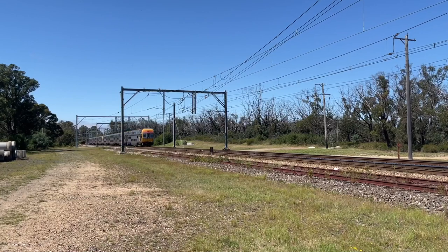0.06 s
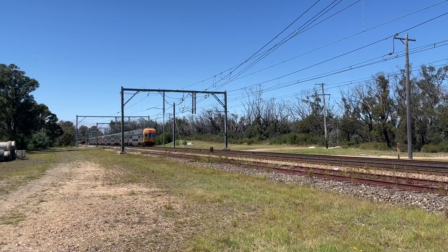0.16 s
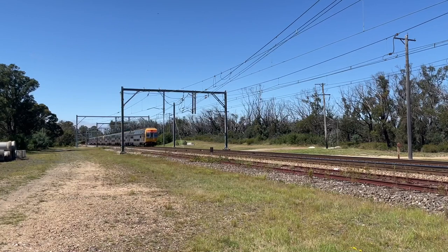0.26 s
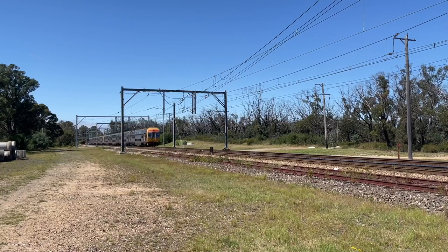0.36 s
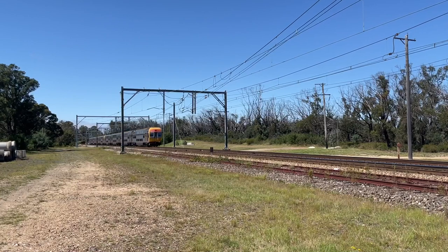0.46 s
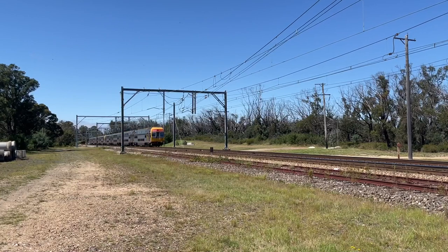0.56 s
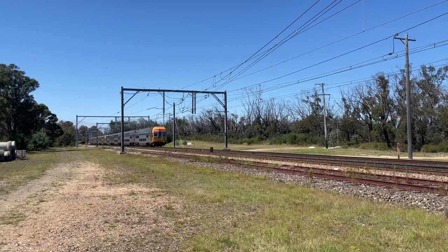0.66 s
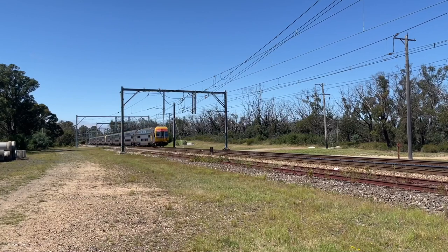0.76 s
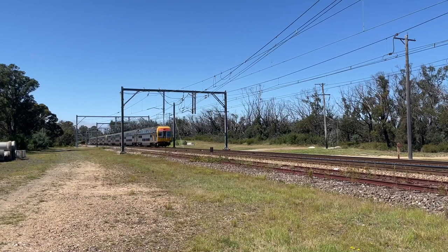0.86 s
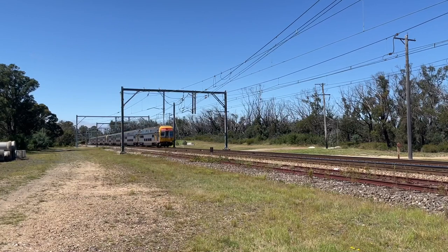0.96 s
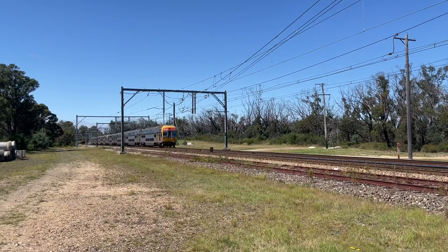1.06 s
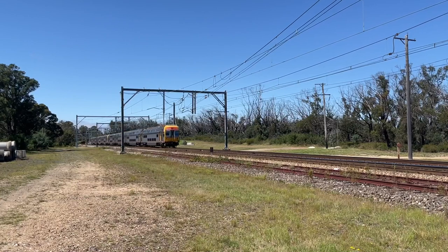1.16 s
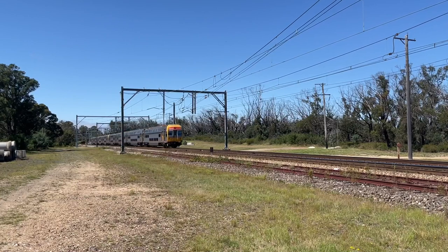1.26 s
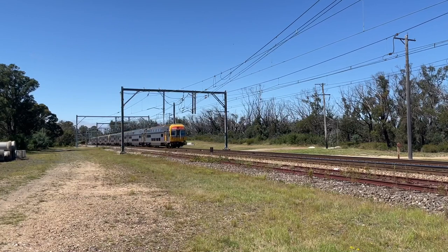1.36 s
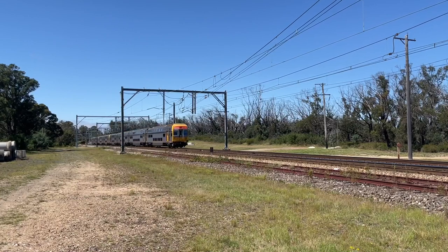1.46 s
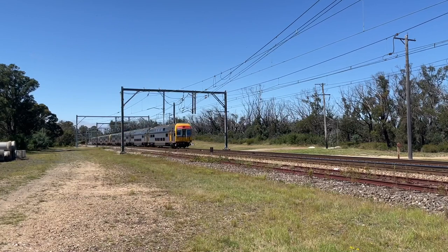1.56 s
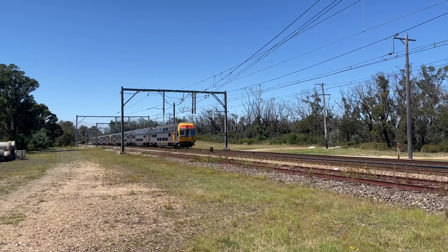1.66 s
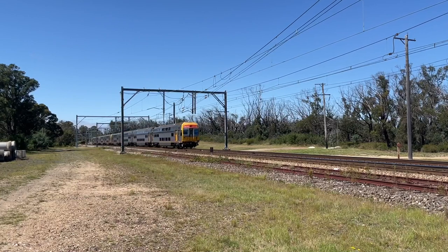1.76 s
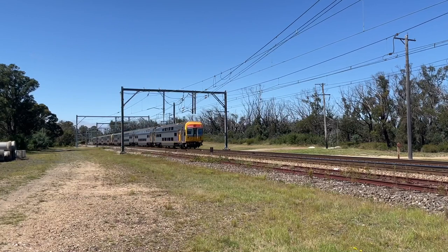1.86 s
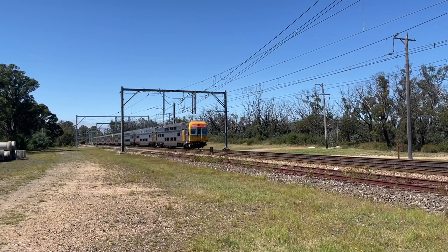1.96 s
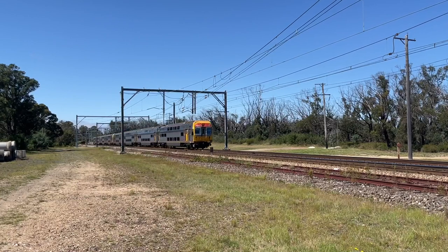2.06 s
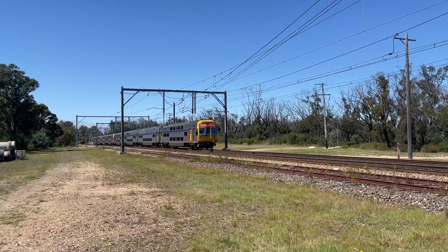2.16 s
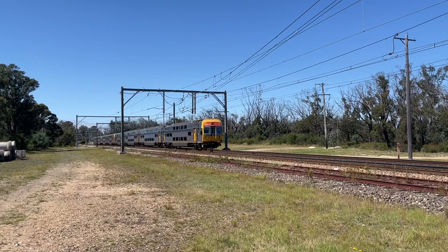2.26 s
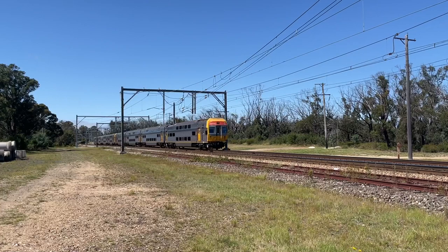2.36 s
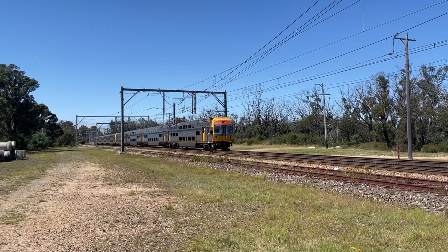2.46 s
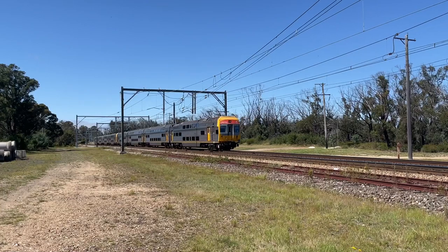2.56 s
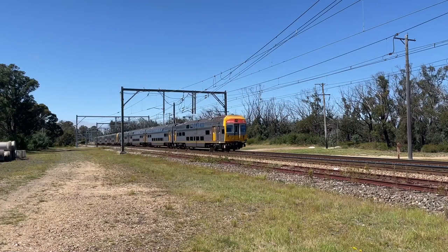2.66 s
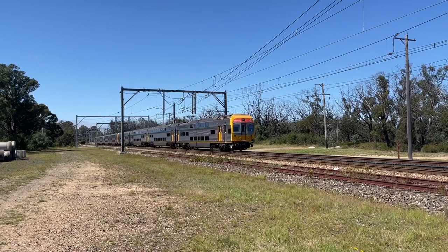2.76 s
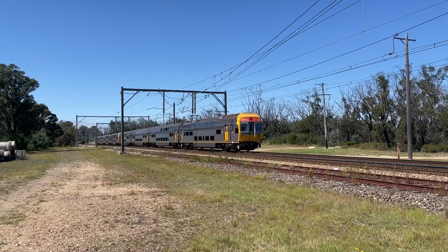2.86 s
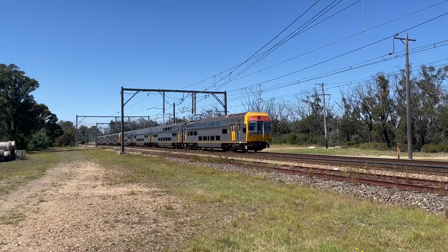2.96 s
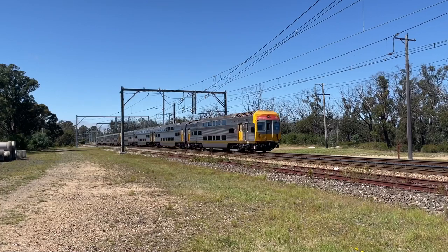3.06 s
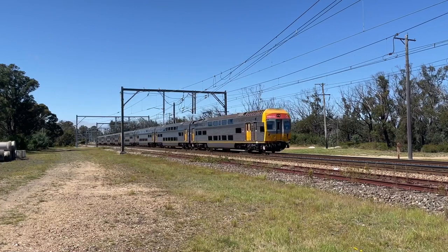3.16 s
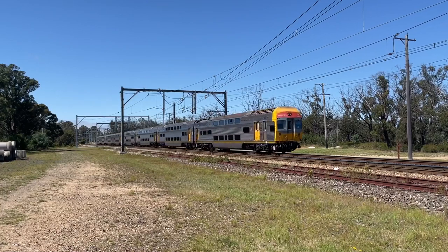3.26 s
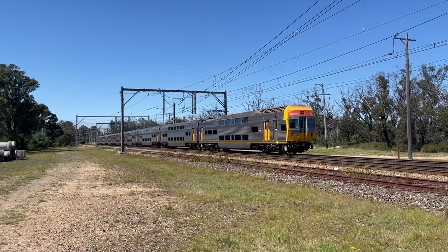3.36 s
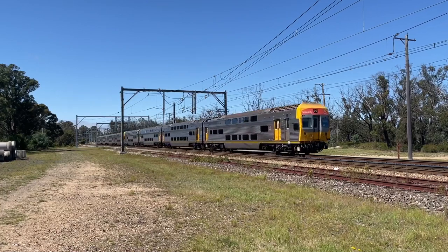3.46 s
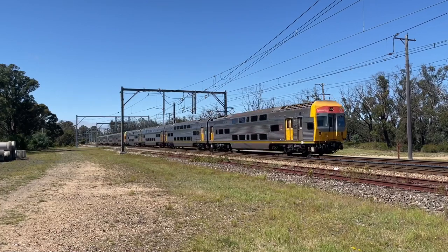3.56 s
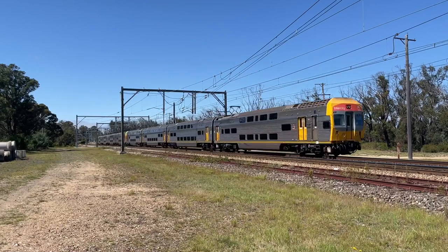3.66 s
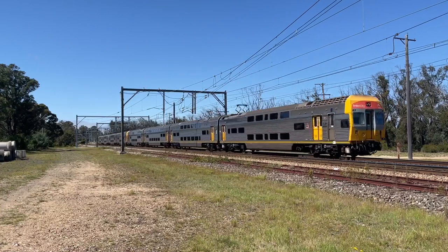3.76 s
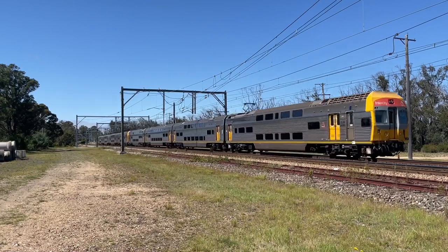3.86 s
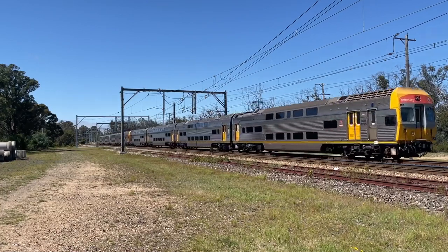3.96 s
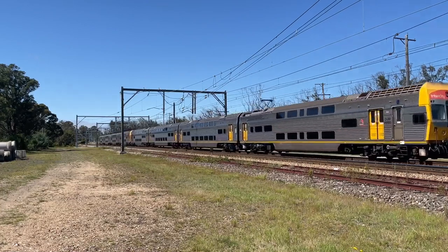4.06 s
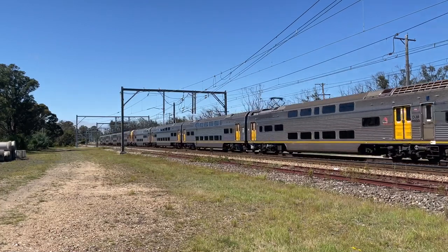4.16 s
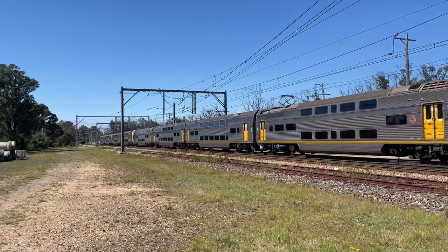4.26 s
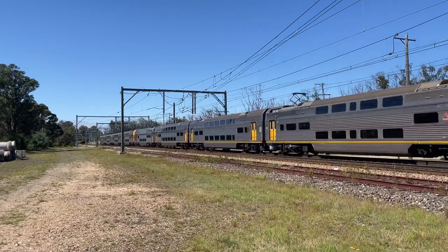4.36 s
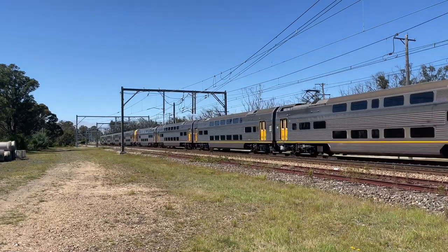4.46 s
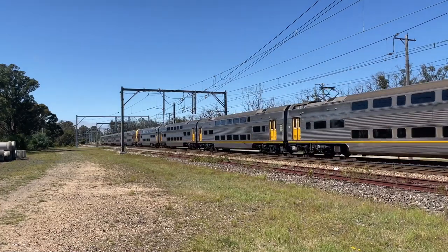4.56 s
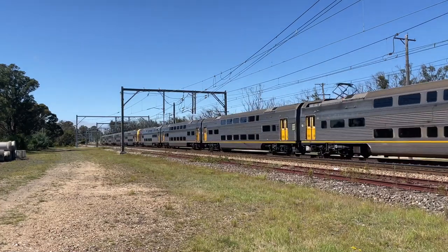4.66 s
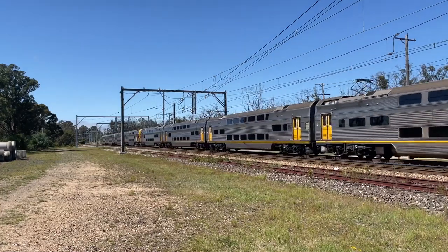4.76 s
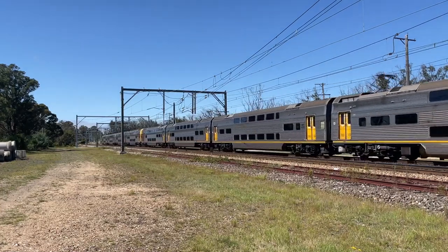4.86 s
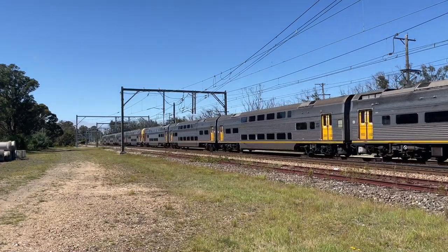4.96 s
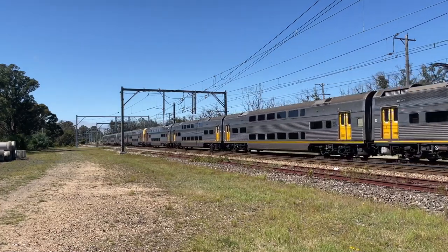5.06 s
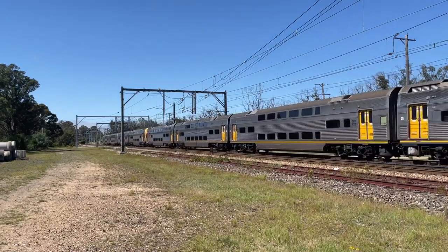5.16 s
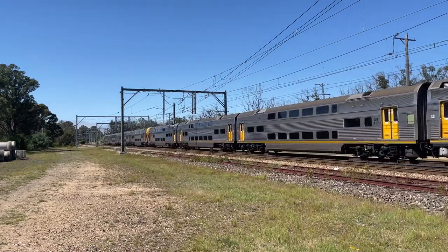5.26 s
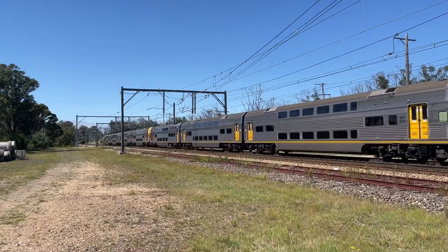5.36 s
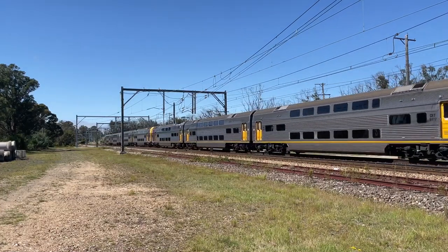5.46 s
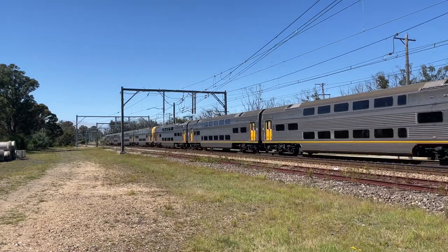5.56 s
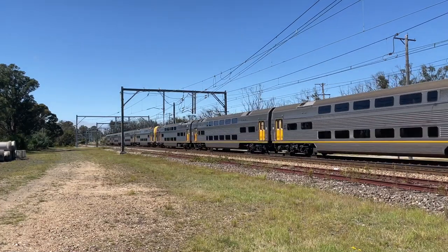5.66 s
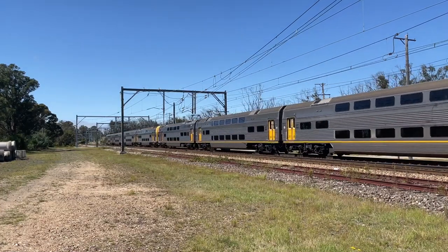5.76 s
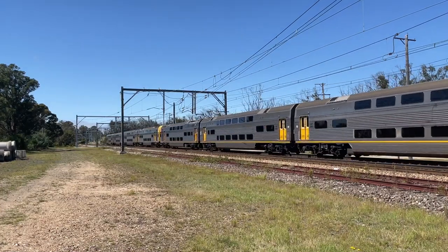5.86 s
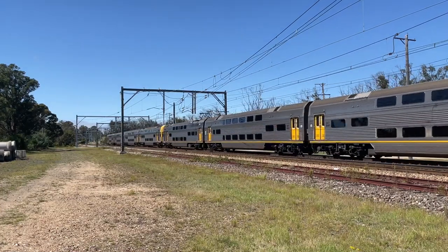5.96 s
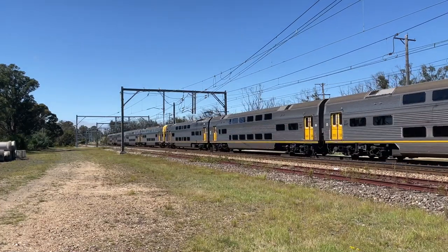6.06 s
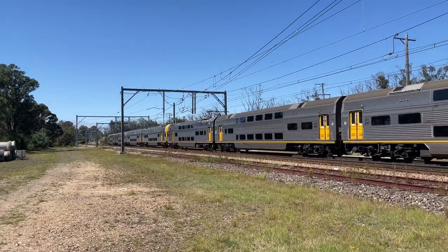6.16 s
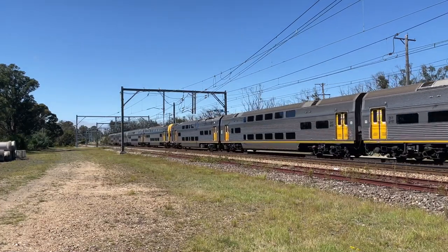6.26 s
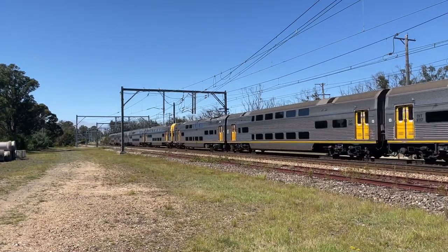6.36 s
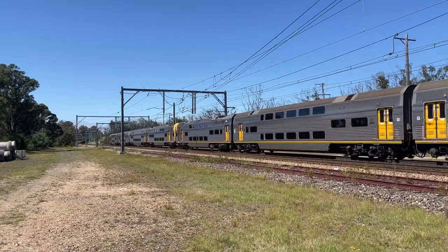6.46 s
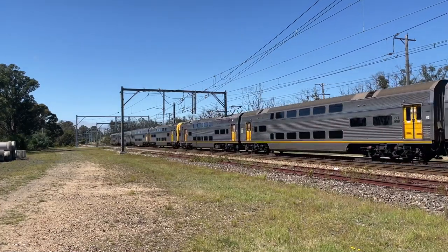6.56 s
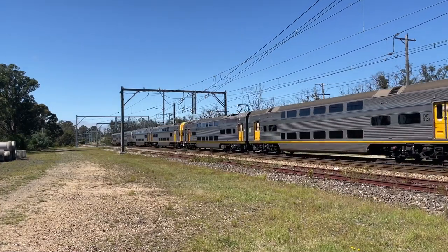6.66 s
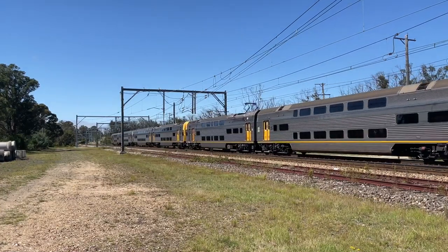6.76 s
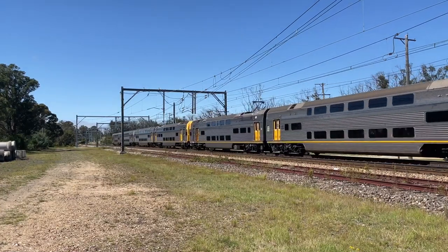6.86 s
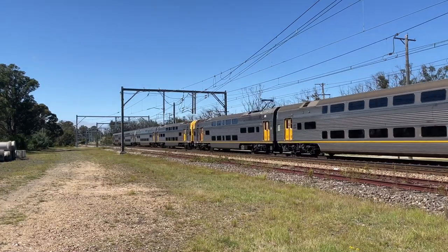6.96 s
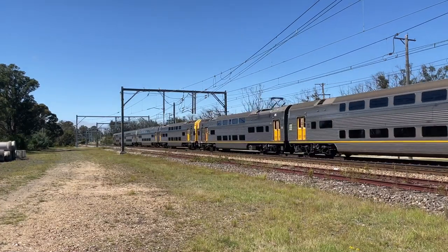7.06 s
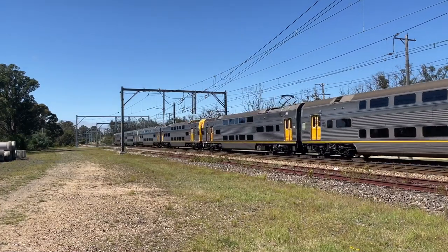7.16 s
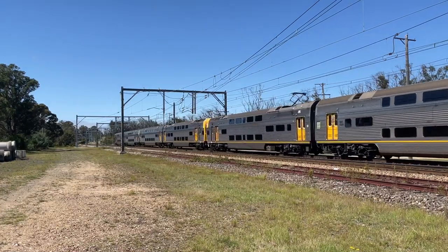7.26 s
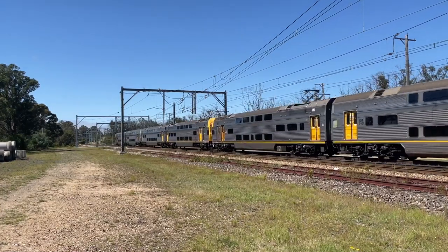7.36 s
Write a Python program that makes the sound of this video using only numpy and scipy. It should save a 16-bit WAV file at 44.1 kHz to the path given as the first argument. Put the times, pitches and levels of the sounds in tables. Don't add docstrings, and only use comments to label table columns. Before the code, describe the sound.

Wind buffets a phone beside a railway as a bird calls, then a train rolls past with ringing wheels, knocks and gear whine.

```python
import sys
import numpy as np
from scipy import signal
from scipy.fft import rfft, irfft, next_fast_len
from scipy.io import wavfile
from scipy.ndimage import uniform_filter1d

SR = 44100
rng = np.random.default_rng(int(sys.argv[2]) if len(sys.argv) > 2 else 0)


def transcribe(u):
    v = np.clip(np.atleast_2d(u).T, -1, 1)
    q = np.round(v * 32767).astype(np.int16)
    wavfile.write(sys.argv[1], SR, q)


def to_linear_factor(level_db):
    exponent = np.asarray(level_db, float) / 20
    return 10 ** exponent


N = 325899
T = np.arange(N) / SR
FAST = next_fast_len(N, True)
HZ = np.fft.rfftfreq(FAST, 1 / SR) + 1

# t/s, level against mid pass/dB, hiss of shoes and wire/dB
NEAR = [(0, -28.5, -39), (1.5, -21.5, -29), (2.4, -17.5, -19.5), (3.0, -11, -8), (3.3, -10, -7.5),
        (3.55, -6.5, -8.5), (4.0, -4, -3), (4.6, 0, 2.5), (4.85, -0.1, 0.4), (5.1, 0.9, -0.5),
        (5.7, 1.5, -3), (5.95, 1.5, -0.5), (6.3, 2, -5), (6.8, 0.7, -1.5), (7.39, 2.5, -2)]
# t/s, f/Hz, level/dB
MESH = [(0, 406, -68), (1.3, 404.3, -55.5), (2.5, 397.5, -50.5), (3.2, 391.2, -47), (3.8, 387.9, -43),
        (4.1, 386.5, -36), (4.6, 384.8, -35.5), (4.95, 380.2, -37), (5.3, 384.7, -34.5), (5.55, 380.2, -38),
        (5.8, 373.7, -30), (6.05, 380.6, -39), (6.2, 378.2, -35), (6.4, 379.4, -32), (6.75, 372, -31.5),
        (6.9, 370, -35.5), (7.0, 372, -34), (7.39, 365.7, -38.5)]


def curves(table):
    s, *columns = np.transpose(table)
    return [np.interp(T, s, c) for c in columns]


def over_hz(table):
    hz, *columns = np.transpose(table)
    return [np.interp(np.log(HZ), np.log(hz), c) for c in columns]


def walk(rate):
    hold = int(SR / rate)
    steps = np.repeat(rng.standard_normal(N // hold + 1), hold)
    return 1.301 * uniform_filter1d(uniform_filter1d(steps, hold), hold)[:N]


def bands(spectrum, lo_hz, count, per_octave):
    white = rfft(rng.standard_normal((2, FAST)))
    noise = white * to_linear_factor(over_hz(spectrum)[0]) * np.sqrt(SR / 2)
    place = np.log2(HZ / lo_hz) * per_octave
    for k in range(count):
        window = np.cos(np.pi / 2 * np.clip(place - k, -1, 1))
        yield lo_hz * 2 ** (k / per_octave), irfft(noise * window, FAST)[:, :N]


def ring(hz, width):
    pole = np.exp(-np.pi * width * 1.55 / SR)
    gain = np.sqrt((1 - pole ** 2) ** 3 / (1 + pole ** 2) / 2)
    settle = 3000
    shaking = rng.standard_normal((2, 2, len(hz) + settle))
    slow = signal.lfilter([gain * np.sqrt(2)], [1, -2 * pole, pole ** 2], shaking)[..., settle:]
    phase = 2 * np.pi * np.cumsum(hz) / SR
    return slow[0] * np.cos(phase) + slow[1] * np.sin(phase)


def add(out, s, piece):
    i = int(s * SR)
    lo, hi = max(i, 0), min(i + piece.shape[-1], N)
    if hi > lo:
        out[:, lo:hi] += piece[..., lo - i:hi - i]


def burst(hz, width, rise_s, fall_s):
    t = np.arange(int((rise_s + 5 * fall_s) * SR)) / SR
    shape = np.clip(t / rise_s, 0, 1) * np.exp(-np.clip(t - rise_s, 0, None) / fall_s)
    hit = ring(np.full(len(t), 1. * hz), width) * shape
    return hit / np.abs(hit).max(axis=1, keepdims=True)


def thump(hz, rise_s, fall_s):
    t = np.arange(int((rise_s + 5 * fall_s) * SR)) / SR
    rise = np.sin(np.pi / 2 * np.clip(t / rise_s, 0, 1)) ** 2
    shape = rise * np.exp(-np.clip(t - rise_s, 0, None) / fall_s)
    return np.sin(2 * np.pi * (hz * t * (1 - 1.35 * t) + rng.random((2, 1)))) * shape


def wind():
    # t/s, gust level/dB
    gust_level = [(0, -39), (.5, -47.5), (.65, -42.5), (1.94, -36), (1.99, -31), (2.55, -29.5),
                  (2.9, -37.5), (3.2, -34), (3.4, -42), (3.82, -45), (3.92, -37.5), (4.5, -35.5),
                  (5.45, -33.5), (5.65, -29.5), (6.3, -35), (6.88, -31), (7.0, -30), (7.39, -28.5)]
    # f/Hz, level/dB per Hz
    gust_colour = [(20, -38), (42, -2), (62, 3.5), (100, 2.5), (160, -1), (250, -18.5), (420, -19.5),
                   (700, -87)]
    # t/s, peak level/dB, f/Hz
    buffets = [(0.619, -27, 62), (0.878, -41, 70), (1.209, -24, 63.6), (1.477, -27, 80), (1.769, -23, 61.8),
               (1.969, -15, 116), (2.03, -17.5, 64), (2.116, -23, 56), (2.238, -23, 115), (2.398, -17, 72),
               (2.607, -18, 113), (2.779, -17.5, 97), (2.828, -18, 102), (2.969, -15, 147),
               (3.038, -22.5, 231), (3.118, -17.5, 77), (3.191, -20.5, 57), (3.477, -20, 94.5),
               (3.873, -21, 125), (4.347, -31, 209.1), (4.519, -25, 147), (4.872, -19.5, 149.8),
               (5.138, -20, 199.4), (5.6, -15.5, 86.36), (5.719, -18, 53.96), (6.036, -18.5, 100),
               (6.16, -20, 197.4), (6.931, -14, 81.9), (7.059, -16, 79.5), (7.127, -15.5, 65.95)]
    thud_db = curves(gust_level)[0]
    flutter_db = -39 + 1.11 * (thud_db + 35.5)
    out, eddy = np.zeros((2, N)), walk(18)
    for hz, band in bands(gust_colour, 25.25, count=10, per_octave=1.95):
        share = np.clip(np.log2(hz / 90) / 0.56, 0, 1)
        gust_db = (1 - share) * thud_db + share * flutter_db
        out += band * to_linear_factor(gust_db - 19.5 + 0.57 * eddy + 0.87 * walk(13))
    for s, db, hz in buffets:
        add(out, s, to_linear_factor(db - 3.0) * thump(hz, 0.012, 0.02))
        add(out, s, to_linear_factor(db - 8.5) * burst(180.4, 75, 0.0055, .02))
    return out


def road():
    # f/Hz, level/dB per Hz
    traffic = [(60, -63), (150, -71), (300, -77), (550, -80.5), (900, -77.5), (1500, -83.5), (2400, -89.5),
               (3400, -100), (3900, -95), (4600, -106), (6500, -109), (8800, -111), (10000, -126),
               (12500, -124), (14200, -116), (15800, -114)]
    # t/s, f/Hz, level/dB
    drone = [(0, 135.2, -35), (.35, 135.2, -36), (.7, 135.2, -38), (.9, 135.2, -44), (1.15, 135.2, -46),
             (1.4, 135.2, -38), (1.7, 135, -55), (7.39, 135, -90)]
    out, swell = np.zeros((2, N)), walk(1.0)
    for _, band in bands(traffic, 60.2, count=17, per_octave=1.752):
        out += band * to_linear_factor(0.75 * swell + 1.56 * walk(8.4))
    hum_hz, hum_db = curves(drone)
    return out + np.sin(2 * np.pi * np.cumsum(hum_hz) / SR) * to_linear_factor(hum_db - 2.5 + 0.36 * walk(9.5))


def whistle(length_s, from_hz, to_hz):
    count = int(length_s * SR)
    note = np.sin(2 * np.pi * np.cumsum(np.linspace(from_hz, to_hz, count)) / SR)
    return np.outer([1, .5], note * signal.windows.tukey(count, .5))


def birds():
    # t/s, peak level/dB
    calls = [(0.0928, -37.5), (0.774, -37.5), (1.4005, -37), (2.149, -37)]
    # t from the loudest/s, f/Hz, width/Hz, length/ms, level/dB
    clicks = [(-.142, 5500, 400, 4, -14), (-.133, 5600, 400, 5, -13), (-.121, 5400, 1500, 5, -6),
              (-.113, 5700, 1500, 4, -12), (-.1, 5240, 1500, 5, -9), (-.1, 5300, 500, 33, -12.5),
              (-.049, 5200, 2200, 3.8, -2), (-.035, 5400, 500, 4, -24), (-.027, 5400, 500, 3.6, -15),
              (0, 5060, 2150, 5, 3.5), (.01, 5000, 2000, 4, -11), (.012, 5170, 1400, 59, -12)]
    # t from the loudest/s, length/s, start f/Hz, end f/Hz, level/dB
    whistles = [
        (-.023, .026, 6350, 6300, -21),
        (.014, .045, 4950, 4550, -19),
        (.022, .032, 7400, 6850, -25),
    ]
    out = np.zeros((2, N))
    for s, call_db in calls:
        for lag, hz, width, ms, db in clicks:
            click = burst(hz, width, .0012, ms / 2000)
            octave = burst(2 * hz, 1200, .0012, ms / 2000)
            add(out, s + lag, to_linear_factor(call_db + db + 4.0) * (click + 0.089 * octave))
        for lag, length_s, from_hz, to_hz, db in whistles:
            add(out, s + lag, to_linear_factor(call_db + db) * whistle(length_s, from_hz, to_hz))
    return signal.sosfilt(signal.butter(4, 4100, "high", fs=SR, output="sos"), out)


def steady(pair, hold_s):
    return pair / np.sqrt(uniform_filter1d(pair ** 2, int(hold_s * SR), mode="reflect") + .05)


def glide(length_s, from_hz, to_hz, width, edge):
    count = int(length_s * SR)
    tone = steady(ring(np.linspace(from_hz, to_hz, count), width), .07)
    return tone * signal.windows.tukey(count, np.clip(edge, 0, 1))


def trills():
    # t/s, length/s, level/dB
    runs = [
        (0.2, 0.41, -70),
        (0.828, 0.21, -68),
        (1.43, 0.56, -74),
    ]
    out = np.zeros((2, N))
    for s, length_s, db in runs:
        for lag in np.arange(0, length_s, .036):
            swell = np.sin(np.pi * (lag + .03) / (length_s + .06)) ** 0.81
            add(out, s + lag, to_linear_factor(db + 3) * swell * glide(.032, 9350, 8300, 150, .5))
    return out


def bush(pair):
    t = np.arange(int(.15 * SR)) / SR
    tail = rng.standard_normal((2, len(t))) * to_linear_factor(-60 * t / 0.13) * (t > .003)
    tail = to_linear_factor(-7.5) * tail / np.sqrt(np.sum(tail[0] ** 2))
    return pair + signal.oaconvolve(pair, tail, axes=1)[:, :N]


def nearness(hz):
    layer_hz = [900, 3200, 12000]
    growth = [0.8, 0.94]
    near_db, hiss_db = curves(NEAR)
    layers = [growth[0] * near_db, growth[1] * near_db, hiss_db]
    shares = [np.interp(np.log(hz), np.log(layer_hz), only) for only in np.eye(3)]
    return sum(share * layer for share, layer in zip(shares, layers))


def wheel_throb():
    turn_s, turn_at_s = .1378, 4.76
    return np.cos(2 * np.pi * (T - turn_at_s) / turn_s)


def rolling():
    # f/Hz, level/dB per Hz
    roar = [(120, -59.5), (200, -64.5), (310, -60.5), (460, -69), (750, -68), (1250, -70), (1700, -75),
            (2300, -72.5), (3300, -74.5), (5200, -80), (7000, -81), (9000, -86), (11500, -97.5),
            (13200, -103), (15800, -101)]
    out, sway, patch = np.zeros((2, N)), walk(8.5) + 0.86 * wheel_throb(), walk(2.7)
    for hz, band in bands(roar, 123.5, count=22, per_octave=3):
        patch = 0.3 * patch + 0.8 * walk(4)
        out += band * to_linear_factor(nearness(hz) + 0.4 * sway + 0.45 * patch + 1.5 * walk(16))
    return out


def ringing_wheels():
    # f/Hz, width/Hz, level/dB
    modes = [(305, 26.5, -40.5), (1974, 29, -44), (2355, 115, -44), (2586, 27, -47.5), (3065, 49, -45),
             (3600, 13, -50.5), (3800, 84, -44.5), (4450, 46, -47.5), (5020, 290, -52)]
    out = np.zeros((2, N))
    doppler = (curves(MESH)[0] / 380) ** .6
    for hz, width, db in modes:
        out += ring(hz * doppler, width) * to_linear_factor(db - 3.5 + nearness(hz) + 1.4 * walk(7))
    return out


def leading_bogie():
    peak_s, spread_s, hz, db = 3.68, 0.93, 2445, -46
    return ring(hz + 0 * T, 450) * to_linear_factor(db + 1.5 * walk(9.1)) * np.exp(-((T - peak_s) / spread_s) ** 2)


def singing_wheels():
    # t/s, length/s, f/Hz, level/dB
    sings = [(2.504, 0.24, 3240, -62), (2.744, 0.34, 3230, -60.2), (2.764, 0.073, 2028, -51.5),
             (2.769, 0.25, 2594, -51), (3.003, 0.14, 3215, -56.3), (3.028, 0.105, 1310, -50),
             (3.218, 0.17, 2000, -52), (3.312, 0.15, 1176, -51), (3.462, 0.15, 1160, -50),
             (3.587, 0.13, 3120, -51), (3.612, 0.14, 3253, -54.1), (3.652, 0.17, 2050, -50.7),
             (3.761, 0.24, 3183, -53.2), (3.891, 0.195, 1193, -46), (4.096, 0.314, 1984, -49),
             (4.365, 0.175, 3140, -50), (4.54, 0.22, 1988, -58), (4.629, 0.25, 3090, -46.7),
             (4.689, 0.11, 1130, -40), (4.819, 0.1, 1380, -44), (4.824, 0.22, 3078, -44),
             (4.849, 0.135, 2470, -49), (4.994, 0.26, 1330, -48), (5.178, 0.14, 1174, -45),
             (5.238, 0.52, 3052, -47), (5.283, 0.21, 1945, -46), (5.542, 0.369, 1164, -44),
             (5.662, 0.185, 1524, -50.3), (5.762, 0.16, 2376, -43), (5.792, 0.25, 3075, -41.5),
             (5.912, 0.16, 1140, -42), (5.986, 0.13, 1525, -44), (6.166, 0.26, 1510, -50.0),
             (6.37, 0.13, 2270, -40), (6.37, 0.21, 1133, -47.6), (6.385, 0.12, 3050, -45.6),
             (6.555, 0.18, 2580, -48), (6.805, 0.15, 2916, -45), (6.979, 0.125, 2421, -42),
             (7.288, 0.096, 1980, -52),
             (2.729, 0.304, 3942, -63), (2.734, 0.319, 4724, -62.8), (2.774, 0.085, 3724, -59.0),
               (2.774, 0.09, 5246, -69), (3.088, 0.195, 5167, -66.0), (3.135, 0.14, 4738, -59),
               (3.283, 0.12, 5470, -65.9), (3.402, 0.175, 5477, -67), (3.517, 0.464, 3880, -51),
               (3.542, 0.095, 4333, -59), (3.597, 0.18, 5400, -63.6), (3.63, 0.669, 4675, -50.5),
               (3.761, 0.145, 4305, -61), (3.816, 0.14, 5468, -63.5), (3.921, 0.15, 4310, -49),
               (4.132, 0.274, 3870, -50.1), (4.166, 0.19, 5119, -58.2), (4.21, 0.155, 4650, -55),
               (4.355, 0.155, 4456, -52), (4.46, 0.145, 5084, -50), (4.465, 0.21, 4600, -54),
               (4.653, 0.155, 3760, -41), (4.834, 0.225, 3700, -42.5), (4.849, 0.165, 3530, -44),
               (4.955, 0.17, 4630, -55), (5.039, 0.125, 5740, -50), (5.148, 0.11, 5230, -50),
               (5.193, 0.334, 4650, -51), (5.419, 0.095, 5287, -50), (5.572, 0.18, 3860, -42),
               (5.677, 0.17, 4996, -49), (5.687, 0.115, 3530, -42.5), (5.78, 0.13, 4280, -49.0),
               (5.793, 0.185, 4584, -51), (5.892, 0.215, 4934, -53), (6.051, 0.135, 4194, -44),
               (6.216, 0.544, 4570, -45.5), (6.231, 0.12, 5042, -50), (6.295, 0.13, 5667, -47),
               (6.41, 0.14, 6000, -49), (6.48, 0.19, 5139, -49), (6.49, 0.17, 3850, -53),
               (6.7, 0.23, 5100, -48), (6.715, 0.195, 3548, -46), (6.904, 0.175, 5340, -51),
               (7.129, 0.175, 4453, -45.9), (7.204, 0.2, 5700, -56), (7.273, 0.115, 5214, -56.1),
               (7.298, 0.105, 4552, -49), (7.318, 0.085, 3500, -52)]
    out = np.zeros((2, N))
    for s, length_s, hz, db in sings:
        end_hz = hz * (1 - .012 * length_s)
        add(out, s, to_linear_factor(db + 1.7) * glide(length_s, hz, end_hz, 22 + hz / 300, 0.7))
    return out * to_linear_factor(1.5 * wheel_throb())


def faint_streaks():
    out, near_db = np.zeros((2, N)), curves(NEAR)[0]
    for when, pitch, span, size in rng.random((90, 4)):
        s, hz = 2.2 + 5.1 * when, 1800 * 3.3 ** pitch
        db = -57 - 9 * pitch + 6 * size + near_db[int(s * SR)]
        add(out, s, to_linear_factor(db) * glide(0.058 + 0.26 * span, hz, hz * .996, 21, 0.54))
    return out


def gears():
    # multiple of mesh pitch, level/dB
    partials = [
        (.5, -1.5),
        (1, -1),
        (2, -8.5),
        (3, -11),
        (4, -14.5),
    ]
    out = np.zeros((2, N))
    mesh_hz, mesh_db = curves(MESH)
    for order, db in partials:
        blurred = ring(order * mesh_hz, 11 * order + 5 / order)
        out += blurred * to_linear_factor(db - 2 + mesh_db + 2.45 * walk(6))
    beat_hz, beat_at_s, beat_from_s, beat_share = 8.7, 5.4, 4.1, 0.58
    fade_in = np.clip((T - beat_from_s) / .2, 0, 1)
    beat = 1 + beat_share * fade_in * np.cos(2 * np.pi * beat_hz * (T - beat_at_s))
    tone = np.sin(2 * np.pi * np.cumsum(mesh_hz + 5 * walk(9)) / SR)
    return out + beat * tone * to_linear_factor(mesh_db + 0.7 + 1.6 * walk(10))


def knocks():
    # t/s, peak level/dB, f/Hz, crack against thud/dB
    strikes = [(2.25, -34.5, 1126, -10), (2.388, -33.5, 920, -10.5), (2.5263, -37, 1053, -9),
               (2.6639, -33, 1114, -2), (2.7947, -28.5, 1300, -4), (2.9294, -27.5, 1447, -16),
               (3.0712, -28, 1206, -16), (4.1394, -31, 1480, 0), (5.228, -26, 803, -5),
               (5.952, -33, 1130, -5), (6.632, -32, 799, -8), (6.892, -27.5, 1896, -11),
               (7.0244, -22, 900, -4)]
    out = np.zeros((2, N))
    for s, db, hz, crack_db in strikes:
        thud = burst(hz, 350, .006, .011) + .7 * burst(.78 * hz, 350, .006, .011)
        crack = burst(2040, 450, .005, .012) + .6 * burst(2560, 500, .005, .012)
        add(out, s, to_linear_factor(db) * thud)
        add(out, s, to_linear_factor(db + crack_db) * crack)
    return out


def train():
    wheels = rolling() + ringing_wheels() + singing_wheels() + faint_streaks() + knocks()
    return wheels + leading_bogie() + gears()


def ports(pair, angle):
    # f/Hz, left lead/rad, likeness/0-1, left minus right/dB
    port_pair = [(30, 0, .88, 1), (120, -0.1, .84, -1), (250, -0.3, .9, -2.8), (450, -0.9, .78, -3.2),
                 (700, -1.79, .7, -3.5), (1300, -2.0, .62, -2), (1800, -1.5, .55, 0.5), (2150, .8, .65, 1),
                 (3000, 0.42, .8, .5), (4100, -1.46, .6, 0.5), (5600, 1.26, .35, 1), (6700, -2.8, .85, 0),
                 (7150, -3.0, .95, 0), (8000, -3.2, .96, 0), (8700, -3.85, .88, 0), (9850, -6.0, .975, 0),
                 (12000, -6.4, .995, 0), (12700, -7.9, .95, 0), (13700, -9.42, .998, 0),
                 (16000, -9.42, .998, 0)]
    lead, like, tilt_db = over_hz(port_pair)
    like = np.clip(like, 0, 1)
    straight, scattered = rfft(pair, FAST) * np.sqrt([(1 + like) / 2, (1 - like) / 2])
    half = to_linear_factor(tilt_db / 2) * np.exp(.5j * lead * angle)
    return irfft([(straight + scattered) * half, (straight - scattered) / half], FAST)[:, :N]


def scene():
    train_angles = (1.04, 0.94)
    air = ports(wind() + road(), 0.86)
    calls = ports(bush(birds()), 0.35) + ports(bush(trills()), .55)
    cars = train()
    turned = np.clip((T - 2.2) / 0.96, 0, 1)
    cars = ports(cars * (1 - turned), train_angles[0]) + ports(cars * turned, train_angles[1])
    pan_db = -.03 * curves(NEAR)[0]
    return cars * to_linear_factor(np.array([pan_db, -pan_db]) / 2) + air + calls


def top_cut(x):
    return signal.sosfilt(signal.butter(12, 15780, fs=SR, output="sos"), x)


def record(dry):
    return top_cut(dry)


dry = scene()
out = record(dry)
transcribe(out)
```